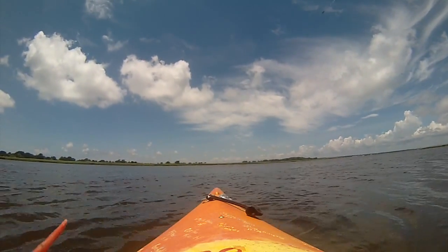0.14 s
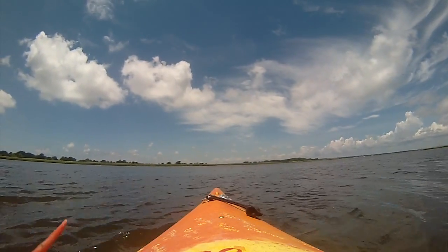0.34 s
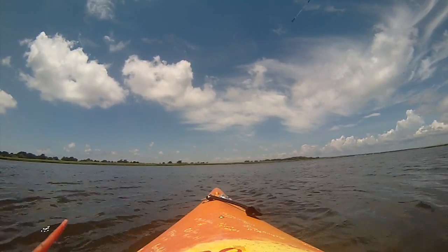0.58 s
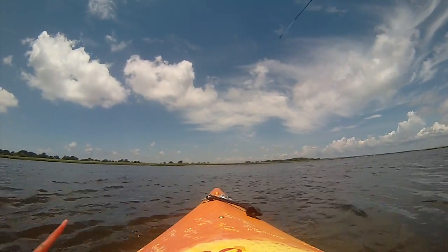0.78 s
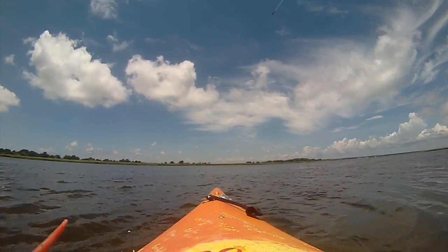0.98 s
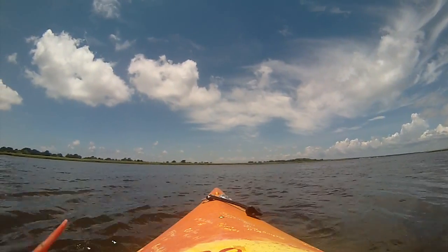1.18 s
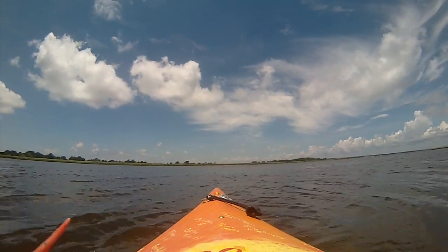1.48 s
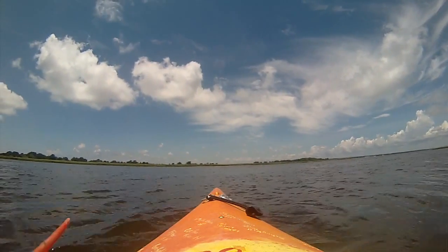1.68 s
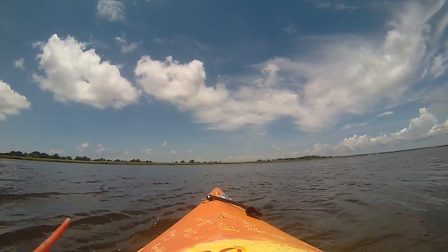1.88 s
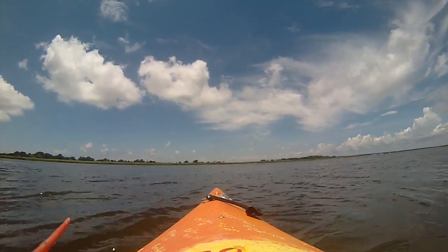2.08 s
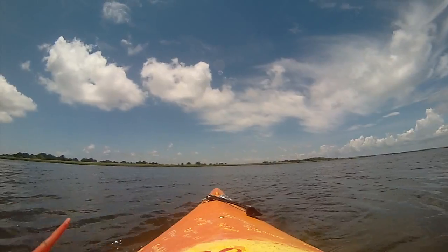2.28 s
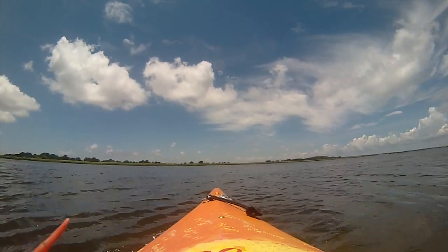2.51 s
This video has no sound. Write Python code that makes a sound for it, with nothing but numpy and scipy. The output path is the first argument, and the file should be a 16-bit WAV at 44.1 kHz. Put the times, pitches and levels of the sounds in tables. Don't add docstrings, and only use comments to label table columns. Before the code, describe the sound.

Water lapping on a kayak hull, close and dry outdoors, over uneven low wind rumble with soft thumps. A rising bubble plop at 0.05 s, light slaps from 0.35 to 0.8, a rounder plop at 1.0, then the strongest knocks and slaps at 1.1-1.35. Scattered slaps and drips follow, wind swelling near 1.8, a plop at 2.0, a small gurgle at 2.33, a last rising blip at 2.5. Faint gritty hiss throughout.

```python
import sys
import numpy as np
from scipy import signal
from scipy.io import wavfile
from scipy.ndimage import uniform_filter1d

SR = 44100
rng = np.random.default_rng(int(sys.argv[2]) if len(sys.argv) > 2 else 0)


def inscribe(sig):
    pcm = np.round(np.clip(np.atleast_2d(sig).T, -1, 1) * 32767)
    wavfile.write(sys.argv[1], SR, pcm.astype(np.int16))


def gain_from_db(level_db):
    decades = np.asarray(level_db, float) / 20
    return 10 ** decades


N = 116865
HOLD_HZ = 12000

# t/s, rumble level/dB, roar level/dB
GUSTS = [(0, -34, -50), (.54, -31, -50.5), (.71, -39, -47.5), (.82, -31.5, -48.5), (.87, -43, -65),
         (.92, -33, -56), (1.3, -38.5, -55), (1.36, -40.5, -56.5), (1.47, -31.5, -58), (1.52, -39.5, -54),
         (1.56, -30.5, -52.5), (1.68, -35.5, -49.5), (1.81, -29.5, -45.5), (2.07, -36.5, -52.5),
         (2.27, -35, -56), (2.481, -42.5, -64), (2.52, -34, -56.5), (2.65, -43.5, -64)]
# f/Hz, density/dB
RUMBLE_SPECTRUM = [(8.8, -31), (15, 0.5), (38, 2), (79, 0.5), (400, -25), (520, -36), (880, -120)]
# f/Hz, density/dB
ROAR_SPECTRUM = [(100, 4), (250, 5), (550, 1.5), (900, -9.5), (1500, -22), (2500, -31.5), (4000, -40),
                 (6000, -52.5)]
# t/s of the peak, peak level/dB
BUFFETS = [(0.039, -31.5), (0.163, -28), (0.316, -20.5), (0.464, -24), (0.538, -20.5), (1.145, -29),
           (1.293, -28), (1.467, -25.5), (1.552, -27.5), (1.605, -24), (1.753, -24), (1.805, -28.5),
           (1.846, -20), (1.905, -29), (2.19, -24.5), (2.257, -27), (2.291, -25.5), (2.533, -28)]
# t/s, level/dB, length/s, brightness/dB, ring f/Hz
SLAPS = [(0.336, -44.5, 0.018, -15, 750), (0.362, -45.5, 0.021, -29, 980), (0.444, -48.5, 0.039, -37, 730),
         (0.488, -47, 0.013, -10, 850), (0.557, -40.5, 0.0073, -16.5, 697),
         (0.701, -52.5, 0.12, -11.5, 544), (0.786, -43.5, 0.0095, -15, 810), (1.124, -45, 0.01, -31, 620),
         (1.139, -36, 0.016, -12.5, 944), (1.252, -42.5, 0.071, -21, 800), (1.263, -39.5, .012, -16.5, 910),
         (1.297, -46, .02, -12.5, 600), (1.274, -32, 0.014, -30, 733), (1.315, -54, 0.027, -3.5, 800),
         (1.345, -40.5, 0.022, -31, 730), (1.46, -46.5, 0.0079, -26, 686), (1.49, -51.5, 0.011, -16, 890),
         (1.525, -44, 0.0095, -22, 785), (1.661, -47, 0.014, -23, 760), (1.726, -45, 0.017, -35, 756),
         (1.774, -48, 0.12, -18, 800), (1.89, -44, 0.0044, -26, 766), (1.918, -38.5, 0.0068, -33, 850),
         (1.963, -48, 0.018, -34, 705), (2.192, -50, 0.026, -34, 770), (2.569, -53, 0.0056, -11, 864),
         (0.688, -59, 0.014, -23, 620), (0.746, -46, 0.017, -25, 1080), (.815, -51, 0.028, -13, 605),
         (1.701, -48, 0.011, -15, 686), (2.129, -62, 0.01, -22, 700), (2.158, -54.5, 0.0068, -22, 696),
         (2.261, -53, 0.007, -31, 740), (2.289, -53, .022, -18, 696), (2.510, -57, 0.0058, -14, 910)]
# t/s, level/dB, first
# f/Hz, last f/Hz, length/s
BUBBLES = [(0.0515, -30.5, 795, 2000, 0.037), (0.158, -38, 1620, 3500, 0.022),
           (0.274, -58, 2300, 2300, 0.012), (0.614, -46.5, 2960, 2420, 0.0096),
           (0.632, -46.5, 1660, 1620, 0.016), (0.808, -40.5, 2310, 2230, 0.0083),
           (0.969, -49, 2730, 2500, 0.012), (0.976, -55, 1600, 1640, 0.045), (.998, -33, 810, 1420, 0.033),
           (1.001, -51, 1740, 2170, 0.021), (1.016, -50, 1300, 1900, 0.021),
           (1.074, -51.5, 1850, 1680, 0.012), (1.317, -43.5, 2174, 2440, 0.018),
           (1.509, -52, 1470, 1450, .01), (1.565, -44.5, 1052, 1724, 0.04), (1.636, -50, 1435, 1890, 0.02),
           (1.807, -39, 1750, 1770, 0.008), (1.956, -59, 1430, 1700, 0.013),
           (2.009, -35.5, 1245, 2240, 0.027), (2.091, -49, 1794, 3400, 0.015),
           (2.163, -43, 2580, 2450, 0.011), (2.039, -50, 2115, 2320, 0.021),
           (2.489, -42.5, 1320, 3320, 0.042), (2.526, -56, 3040, 3300, .009), (.698, -50, 564, 540, 0.016),
           (.722, -41, 550, 580, 0.016), (.745, -51, 566, 550, 0.016), (1.165, -47, 914, 900, .019),
           (2.569, -53, 2930, 2876, 0.015)]
BENDS = [1.9, 1.36, 2.1, 1.08, 1.1, 1.53, 1.4, 2.6]
# t/s, level/dB, f/Hz
TICKS = [(.006, -61, 3030), (.020, -56, 5000), (.020, -65, 3650), (.019, -59, 2960), (.169, -60.5, 4750),
         (.185, -60, 5000), (0.19, -62, 2850), (.225, -53, 3330), (.635, -52.5, 2500), (.723, -66, 2820),
         (.725, -51, 1690), (.814, -54, 2850), (.846, -62, 2650), (.918, -59, 2300), (.948, -62, 2600),
         (1.213, -55, 1460), (1.648, -50.5, 1930), (1.752, -58, 2300), (1.796, -47, 1600),
         (2.221, -64, 1434), (.757, -58, 5100), (.812, -54, 3720), (.908, -59.5, 2520), (1.241, -55, 2090),
         (1.261, -47.5, 2880), (1.262, -62, 4830), (1.292, -53.5, 4860), (1.319, -51, 3050),
         (1.493, -65, 2000), (1.572, -58, 3530), (1.694, -61, 2500), (1.854, -55, 2130), (1.891, -55, 2090),
         (2.297, -65, 3100), (2.491, -57.5, 3700), (2.599, -50.5, 2400), (2.6, -55.5, 3700)]
# t/s, level/dB, centre f/Hz
CLICKS = [(.001, -52, 3000), (.050, -48, 3180), (.225, -48, 2200), (.227, -49, 4600), (.338, -58, 1680),
          (.365, -50, 1800), (.376, -54, 2600), (.560, -55, 1600), (.614, -42, 1490), (.889, -50, 1500),
          (.930, -50, 1490), (1.138, -31, 1790), (1.139, -58, 3630), (1.495, -61, 1800), (1.735, -56, 1600),
          (1.807, -51, 3000), (1.845, -56, 2200), (1.935, -50, 2200), (2.157, -64, 1400)]
# level/dB, first f/Hz, top f/Hz, last f/Hz, length/s
GURGLE = (-40.5, 823, 872, 533, 0.0752)
# f/Hz, density/dB
HISS_SPECTRUM = [(290, -61), (500, -11), (1910, -9.5), (3240, -13), (4600, -16.5), (5900, -21.5),
                 (7670, -62), (13000, -120)]


def evened(x):
    return x / np.sqrt(np.mean(x ** 2) + 1e-20)


def read(points, hz):
    f, value = np.transpose(points)
    return np.interp(np.log(hz + 1), np.log(f + 1), value)


def add(mix, s, sound):
    part = mix[round(s * SR):][:len(sound)]
    part += sound[:len(part)]


def resonate(x, hz, width):
    turn = np.exp(2j * np.pi * hz * np.arange(len(x)) / SR)
    r = np.exp(-np.pi * width / SR)
    return 2 * (turn * signal.lfilter([1 - r], [1, -r], x / turn)).real


def noise(spectrum, size, patchy_db, flicker_db):
    frames, hz = 4 * N // size + 8, np.fft.rfftfreq(size, 1 / SR)
    a, b, patches = rng.standard_normal((frames, len(hz), 3)).T
    patches = uniform_filter1d(patches, size=6, axis=0)
    patches = evened(uniform_filter1d(patches, size=8, axis=1))
    flicker = evened(uniform_filter1d(rng.standard_normal(frames), size=3))
    gain = gain_from_db(read(spectrum, hz)[:, None] + patchy_db * patches + flicker_db * flicker)
    gain = gain * (hz <= HOLD_HZ / 2)[:, None]
    x = signal.istft((a + 1j * b) * gain, nperseg=size, noverlap=3 * size // 4)[1]
    return evened(x[:N])


def wind():
    s, rumble_db, roar_db = np.transpose(GUSTS)
    t = np.arange(N) / SR
    rumble = noise(RUMBLE_SPECTRUM + [(600, -65.5)], size=4096, patchy_db=2.0, flicker_db=0.6)
    rumble = evened(rumble + 0.12 * (rumble ** 2 - 1))
    lumps = evened(uniform_filter1d(rumble, size=200))
    roar = noise(ROAR_SPECTRUM, size=512, patchy_db=3.5, flicker_db=1.0)
    roar = evened(roar * gain_from_db(1.2 * np.clip(lumps, -2.5, 2.5)))
    rumble_gain = gain_from_db(np.interp(t, s, rumble_db) + 0.27)
    roar_gain = gain_from_db(np.interp(t, s, roar_db) + 2.0)
    return rumble_gain * rumble + roar_gain * (roar + gain_from_db(-7.5) * crackle())


def buffet(db):
    half_width_s = 0.0025
    u = np.arange(-.02, .02, 1 / SR) / half_width_s
    return gain_from_db(db) * (1 - u ** 2) * np.exp(-u ** 2 / 2)


def crackle(count=10):
    per_s, low_hz, top_hz, relative_width = 1000, 498, 2000, 0.43
    sizes = gain_from_db(2.2 * np.minimum(rng.exponential(1, N), 4))
    clicks = (rng.random(N) < per_s / SR) * rng.standard_normal(N) * sizes
    pocket = rng.integers(0, count, N)
    mix = np.zeros(N)
    for k, hz in enumerate(np.geomspace(low_hz, top_hz, count)):
        ring = clicks * (pocket == k)
        for _ in range(3):
            ring = resonate(ring, hz, relative_width * hz)
        mix += evened(ring) * hz ** -1.7
    return evened(mix)


def slap(db, length, bright_db, ring_hz, push):
    hull_hz, hull_width_hz = 564.4, 71
    splash_hz, splash_width_hz = 1600, 850
    t = np.arange(len(push)) / SR
    shape = np.minimum(t / 0.0026, 1) * gain_from_db(-10.5 * (t / length) ** 2)
    width = 0.25 * ring_hz
    body = evened(resonate(resonate(push, ring_hz, width), ring_hz, 2 * width))
    hull = evened(resonate(resonate(push, hull_hz, hull_width_hz), hull_hz, 2 * hull_width_hz))
    splash = resonate(resonate(push, splash_hz, splash_width_hz), splash_hz, splash_width_hz)
    splash = evened(resonate(splash, splash_hz, 2 * splash_width_hz))
    thud = np.exp(-t / 0.005) * np.sin(2 * np.pi * ring_hz * t)
    smack = gain_from_db(bright_db + 12.5) * np.exp(-t / 0.0016) * np.sin(2 * np.pi * splash_hz * t)
    knock = np.minimum(t / 0.0013, 1) * (thud + smack)
    wash = shape * (body + gain_from_db(-4.5) * hull + gain_from_db(bright_db) * shape ** .5 * splash)
    return gain_from_db(db - 1.5) * (wash + gain_from_db(4.5) * knock)


def bubble(db, first_hz, last_hz, length, bend):
    t = np.arange(0, length, 1 / SR)
    u = t / length
    hz = first_hz * (last_hz / first_hz) ** (u ** bend)
    hz = hz * (1 + 0.06 * np.exp(-t / 0.0041))
    rise = np.sin(np.pi / 2 * np.minimum(t / 0.00037, 1)) ** 2
    shape = rise * gain_from_db(-19.5 * u ** 0.64) * np.minimum(6.6 * (1 - u), 1)
    shape = shape * gain_from_db(1.2 * np.sin(2 * np.pi * 71 * t * (1 + u) + first_hz))
    closure = np.minimum(t / .0004, 1) ** 2 * np.exp(-t / .0007) * np.sin(2 * np.pi * 2.2 * first_hz * t)
    return gain_from_db(db) * (shape * np.sin(2 * np.pi * np.cumsum(hz) / SR) + gain_from_db(-10.5) * closure)


def droplet(db, hz, cycles):
    turns = np.arange(0, 3 * cycles, hz / SR)
    shape = np.minimum(turns / 0.35, 1) * np.exp(-2.5 * turns / cycles)
    return gain_from_db(db + 3.5) * shape * np.sin(2 * np.pi * turns)


def gurgle(db, first_hz, top_hz, last_hz, length):
    u = np.arange(0, 1, 1 / (length * SR))
    hz = np.interp(u, [0, .2, 1], [first_hz, top_hz, last_hz])
    hz = hz * (1 + .05 * np.sin(2 * np.pi * 4.3 * u))
    pulses = 1 + .35 * np.cos(2 * np.pi * (u - .2) / .26)
    shape = np.sin(np.pi * u ** .5) ** 1.1 * pulses * gain_from_db(-2 * u)
    return gain_from_db(db) * shape * np.sin(2 * np.pi * np.cumsum(hz) / SR)


def spray(mix):
    per_s = 70
    for when, pitch, size, ring in rng.random((round(per_s * N / SR), 4)):
        db = -76.5 - 3.8 * np.log(size + 0.011)
        add(mix, when * N / SR, droplet(db, 900 * 5 ** pitch, 3 + 10 * ring))


def water():
    mix = np.zeros(N)
    grains = (len(SLAPS), 6000)
    pushes = rng.standard_normal(grains) * (1.5 + rng.exponential(1, grains))
    for (s, *row), push in zip(SLAPS, pushes):
        add(mix, s, slap(*row, push))
    bends = iter(BENDS)
    long_s = sorted(row[-1] for row in BUBBLES)[-len(BENDS)]
    for s, *row in BUBBLES:
        bend = next(bends, 1) if row[-1] >= long_s else 1
        add(mix, s, bubble(*row, bend))
    for s, db, hz in TICKS:
        add(mix, s, droplet(db, hz, cycles=13.1))
    for s, db, hz in CLICKS:
        add(mix, s, droplet(db, hz, cycles=1.8))
    spray(mix)
    add(mix, 2.331, gurgle(*GURGLE))
    return mix


def hiss():
    return gain_from_db(-71.5) * noise(HISS_SPECTRUM, size=1024, patchy_db=-1.6, flicker_db=1.77)


def scene():
    mix = wind() + water() + hiss()
    for s, db in BUFFETS:
        add(mix, s - .02, buffet(db))
    return mix[None]


def top_cut(x):
    return signal.sosfilt(signal.butter(12, 15740, fs=SR, output="sos"), x)


def record(dry):
    slow = signal.resample(dry, round(N * HOLD_HZ / SR), axis=1)
    held = signal.resample(np.repeat(slow, 16, axis=1), N, axis=1)
    return top_cut(held)


dry = scene()
out = record(dry)
inscribe(out)
```